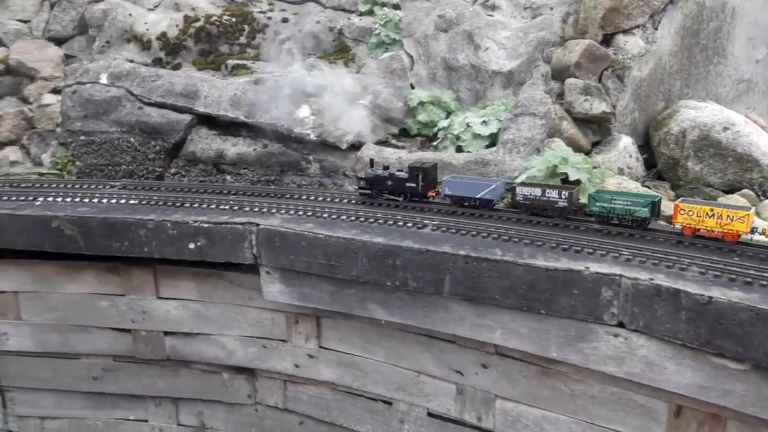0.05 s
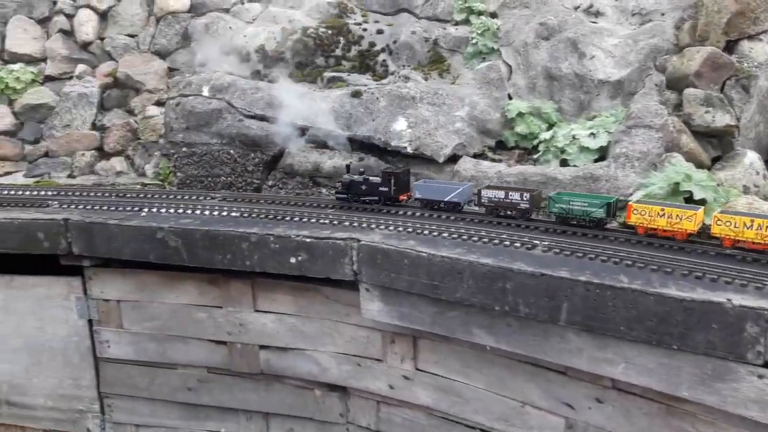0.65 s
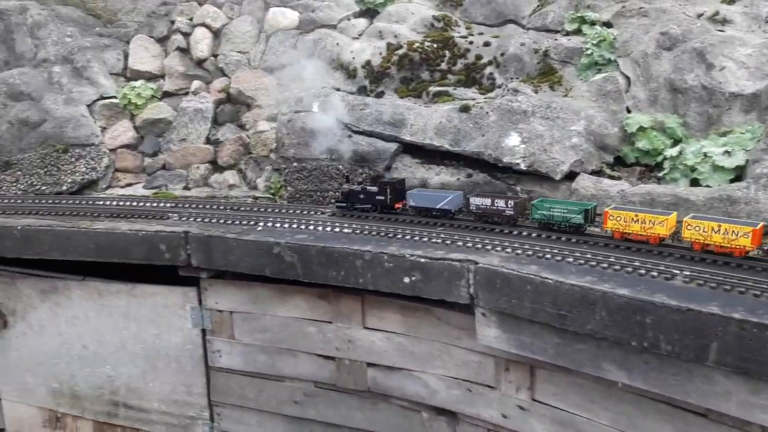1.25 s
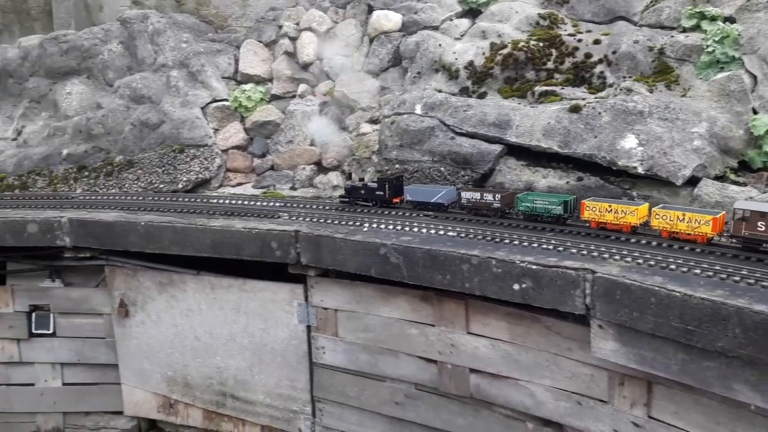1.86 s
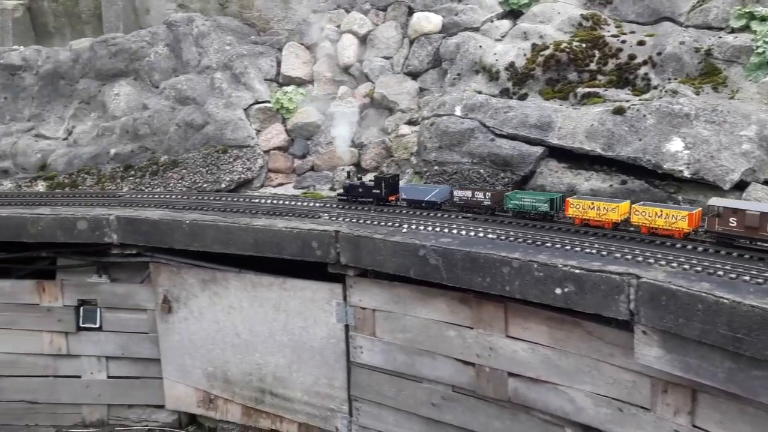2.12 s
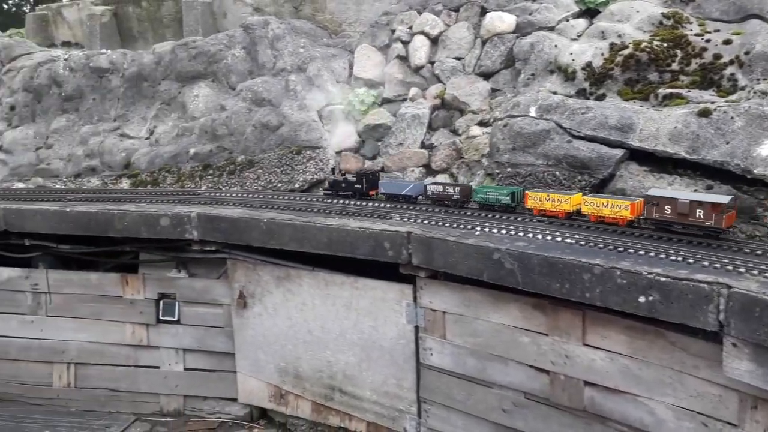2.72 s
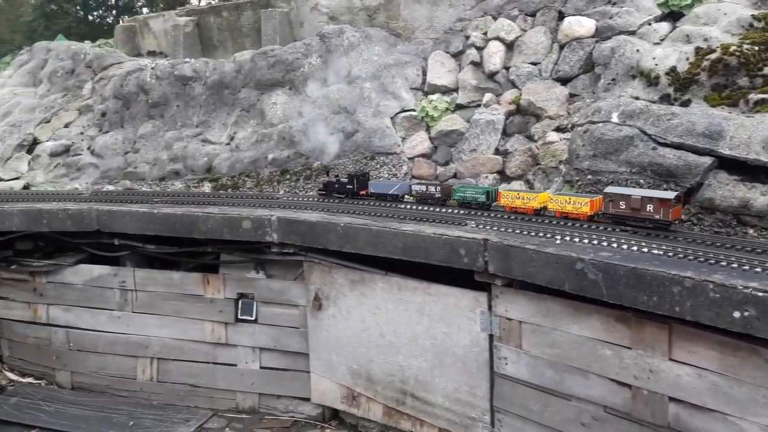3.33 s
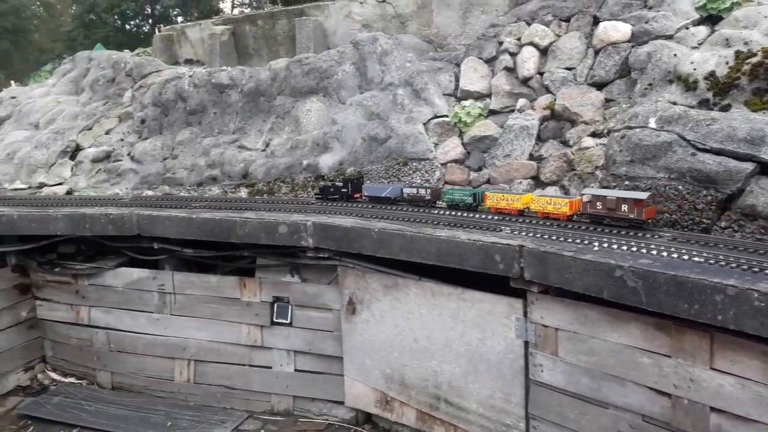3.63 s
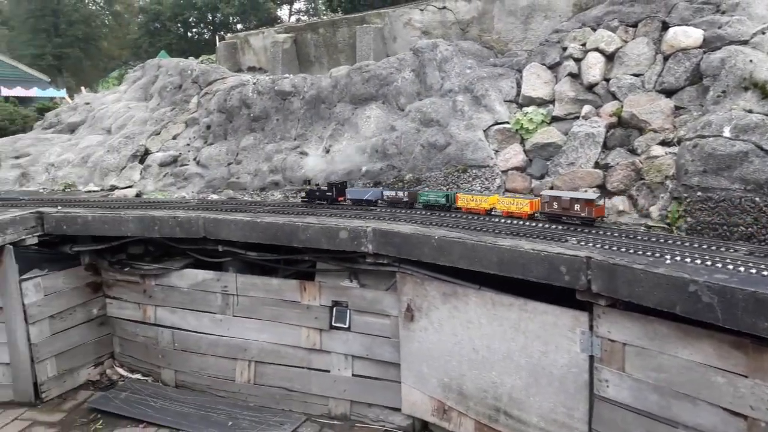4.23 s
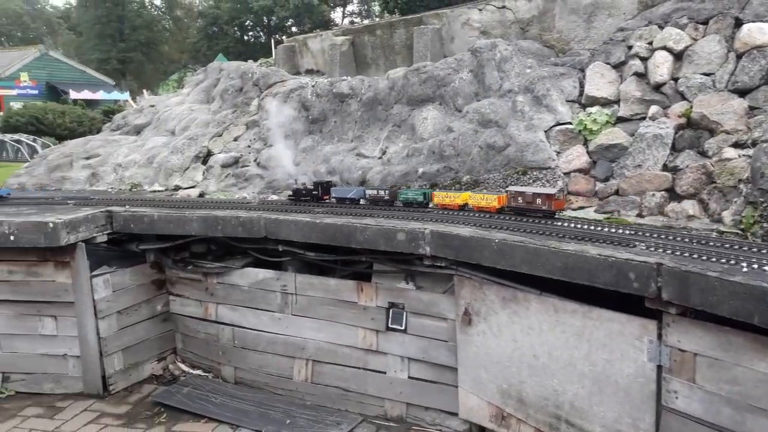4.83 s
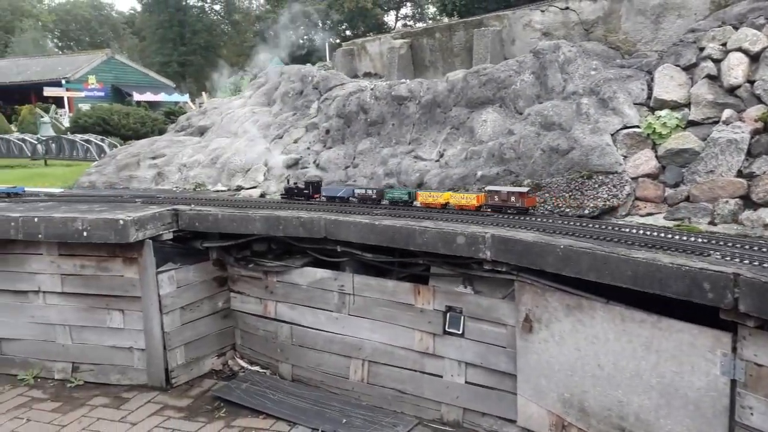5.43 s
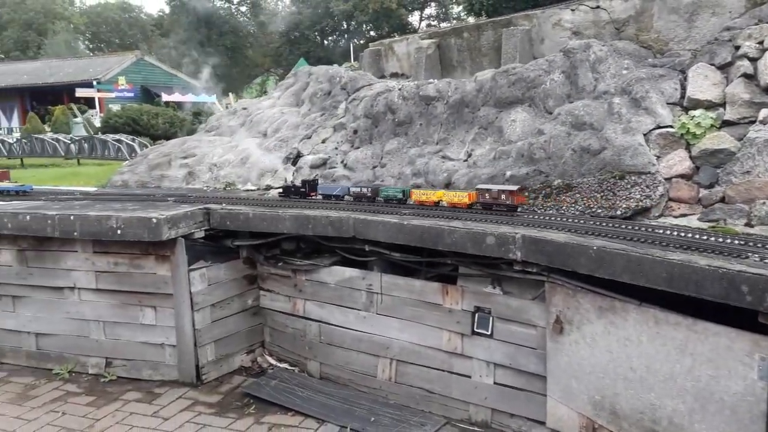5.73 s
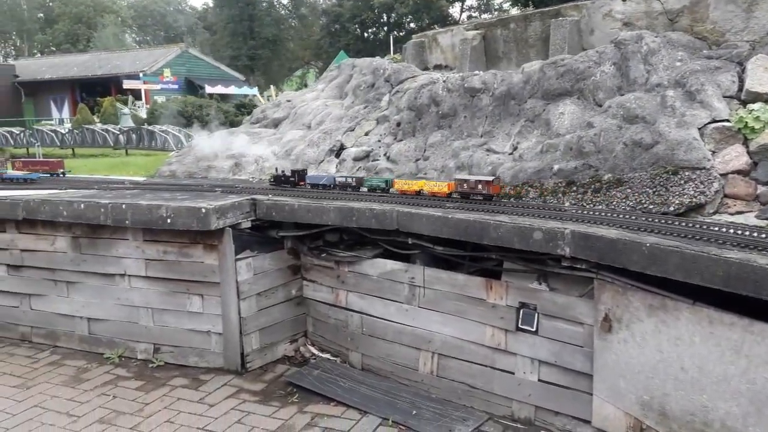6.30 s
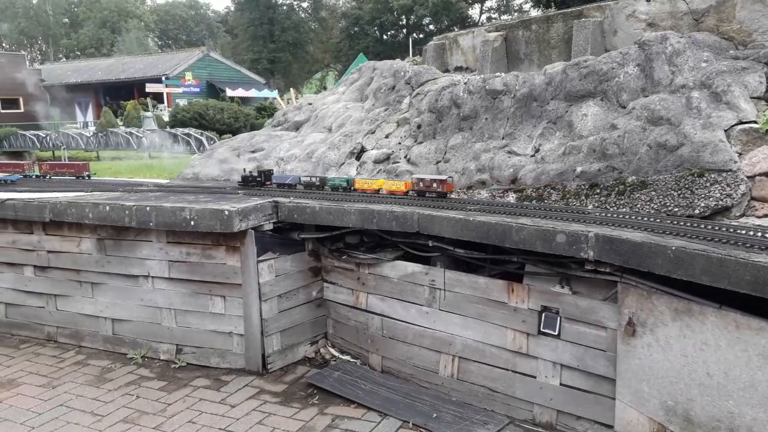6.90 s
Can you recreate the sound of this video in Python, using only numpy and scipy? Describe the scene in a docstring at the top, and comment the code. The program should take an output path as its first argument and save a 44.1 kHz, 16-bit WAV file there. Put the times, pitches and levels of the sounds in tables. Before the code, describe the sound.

A model steam train is close from the start on an outdoor garden track, chuffing very quickly in an uneven four-beat pattern with a thin, throbbing metallic note. Its wheels hiss, scuff and roll with a hollow ring, while a light wind rumbles unevenly on the microphone. From about 0.5 to 2 seconds the wheels give short squeals on the curve. Between 1.8 and 3.2 seconds they clack lightly over several rail joints, and the train gradually draws away, squealing once near 4 seconds. Around 4.5 seconds a bird gives two faint rising chirps. At about 5 seconds a strong gust buffets the microphone with low rumbling and thumps, easing by around 6 seconds. More brief squeals come from 5.5 seconds on, with one more clack near 5.9, and the train is still running, farther off, at 7 seconds.

```python
"""Beside a garden track, one microphone in the open air. From the start a model steam train is close,
chuffing quickly, four beats to a wheel turn; its wheels hiss, scuff and roll with a hollow ring.
From 0.5 s they squeal in bursts on the curve, and from 1.8 s they clack over joints as the train
draws away along a rock wall. Near 4.5 s a bird chirps twice, faintly. Around 5 s the wind, there all
along, buffets the microphone in one strong gust, and the train runs on, farther off."""
import sys
import numpy as np
from scipy import signal
from scipy.fft import rfft, irfft
from scipy.io import wavfile
from scipy.ndimage import uniform_filter1d

SR = 44100
rng = np.random.default_rng(int(sys.argv[2]) if len(sys.argv) > 2 else 0)


def inscribe(sig):
    """Save sig as 16-bit PCM at rate SR to the path in sys.argv[1].

    A 1-D sig is mono; a 2-D sig holds one channel per row.
    Samples are clipped to [-1, 1] before scaling.
    """
    pcm = np.round(np.clip(np.atleast_2d(sig).T, -1, 1) * 32767)
    wavfile.write(sys.argv[1], SR, pcm.astype(np.int16))


N = 311346
TIME = np.arange(N) / SR

# Pace of the engine along the track: time_s, beats_per_s
ENGINE_SPEED = [(0.0, 23.14), (0.59, 22.31), (1.18, 21.47), (1.76, 21.56), (2.35, 21.7), (2.94, 22.12),
                (3.53, 22.67), (4.11, 23.35), (4.7, 23.91), (5.29, 23.47), (5.88, 23.14), (6.46, 21.37),
                (7.05, 20.64)]
def beat_count():
    """Exhaust beats so far: a measure of the distance run."""
    return np.cumsum(curve(ENGINE_SPEED)) / SR - .3


# The four uneven beats of a wheel turn: accent_db
BEAT_ACCENTS = [7.7, 7.8, 8.1, 3.8]
# Exhaust steam at the microphone, close at first, then farther off: time_s, level_db
EXHAUST_LEVEL = [(0, -44.5), (1.5, -44), (3, -48.5), (4.5, -48), (5.8, -51), (7.06, -52.5)]
# Colour of the steam at the chimney: frequency_hz, gain_db
CHIMNEY_COLOUR = [(700, -13), (1700, -9.5), (2500, -15.5), (4400, -5.5), (5200, 3.5), (6100, -3),
                  (7200, -4), (8900, -11.5), (9900, -8), (10800, -13.5), (12000, -36), (13700, -37),
                  (15300, -15.5)]
def chuffs(sharpness=0.56, leak=0.092, uneven_db=3.0, crackle_db=-11):
    """Each piston stroke lets a puff of steam up the chimney."""
    beats = beat_count()
    accent = gain_of(BEAT_ACCENTS)[np.round(beats).astype(int) % len(BEAT_ACCENTS)]
    puffs = abs(np.cos(np.pi * beats)) ** sharpness
    valve = leak + accent * puffs * gain_of(uneven_db * wander(26))
    crackle = gain_of(crackle_db) * specks(per_s=320)  # fine, faint treble crackle in the chuffs
    steam = coloured(noise() + crackle, CHIMNEY_COLOUR)
    return gain_of(curve(EXHAUST_LEVEL)) * unit_rms(valve) * steam


# Wheels hissing on the rails, fading with distance: time_s, relative_level_db
HISS_LEVEL = [(0, -36), (1.8, -36.5), (2.7, -38), (3.4, -39.5), (4.4, -39.5), (5.85, -39.5), (6.15, -43.5),
              (7.06, -45)]
# How hard one wagon wheel rubs: time_s, relative_level_db
SCUFF_LEVEL = [(0, -49), (1.4, -45), (2.3, -44), (3.1, -40), (3.75, -54), (4.3, -45), (4.55, -47),
               (5.9, -60), (6.55, -44), (7.06, -47)]
# High ringing of the wheels: pitch_hz, width_hz, gain_db
HIGH_WHEEL_MODES = [(3249, 110, 2), (3840, 180, -1.5), (4020, 74, -26), (4640, 75, -2), (6200, 110, -8.5),
                    (6580, 150, -6), (6826, 130, 3), (7660, 200, -12)]
def wheel_hiss(hiss_db=-2.12, scuff_db=3.0, uneven_db=2.0, flutter_db=2.14, grit_db=-9, ring_db=-10):
    """Gritty rolling contact hisses, swells as a wheel scuffs once a turn, and sets the wheels ringing."""
    turns_per_beat, rub_at_turns, rub_width_turns = .3135, .76, .31
    turns_from_rub = (turns_per_beat * beat_count() - rub_at_turns + .5) % 1 - .5
    rub = .5 ** ((2 * turns_from_rub / rub_width_turns) ** 2)
    scuff_power = rub * gain_of(curve(SCUFF_LEVEL) + scuff_db + uneven_db * wander(2.7)) ** 2
    hiss_power = gain_of(curve(HISS_LEVEL) + hiss_db) ** 2
    grit = gain_of(grit_db) * specks(per_s=300)
    contact = noise() * gain_of(flutter_db * wander(79)) + grit
    hiss = receding(contact)
    ring = gain_of(ring_db) * ringing(HIGH_WHEEL_MODES)
    return np.sqrt(hiss_power + scuff_power) * (hiss + ring)


# Colour of the wheels near the microphone and far down the track: frequency_hz, gain_db
NEAR_COLOUR = [(600, -16.5), (1500, -3.5), (2450, -11), (2800, -6.5), (3250, -1), (4600, -1), (5100, -3.5),
               (5700, -1.5), (7100, -2), (8900, -18), (10500, -23.5), (12000, -30.5), (13800, -36),
               (15300, -30)]
FAR_COLOUR = [(600, -18), (1400, -0.5), (2050, -10), (2300, -11), (3300, 1), (3850, 2), (4600, -7),
              (5200, 2.5), (6100, 0.5), (7500, 1), (8900, -18), (10500, -24.5), (12200, -43), (15500, -32)]
def receding(x):
    """Bright sound from the wheels changes colour as the train draws away."""
    far = TIME / TIME[-1]
    return (1 - far) * coloured(x, NEAR_COLOUR) + far * coloured(x, FAR_COLOUR)


# Rolling wheels, heard from the trackside: time_s, level_db
ROLL_LEVEL = [(0, -37), (0.4, -36), (1.35, -38.5), (1.85, -38.5), (2.05, -43.5), (2.6, -39), (3.2, -43.5),
              (4.15, -43), (4.7, -49), (5.0, -44.5), (6.4, -46.5), (6.82, -43), (7.06, -50.5)]
# Hollow resonances of wheels and track: pitch_hz, base_width_hz, gain_db
HOLLOW_MODES = [(932.3, 105, 3.5), (971, 216, -7), (1368, 98, -12), (1825, 400, -15.5)]
def rolling(rough_db=2.0, broaden=1.18):
    """Uneven rails shake the wheels, which ring in a few broad resonances."""
    contact = gain_of(rough_db * wander(24))
    ring = sum(gain_of(db) * resonate_twice(contact * noise(), hz, broaden * width)
               for hz, width, db in HOLLOW_MODES)
    return gain_of(curve(ROLL_LEVEL)) * steadied(ring, size=4000)


# Flanges rubbing on the curve: start_s, end_s, relative_level_db, overtones_db
FLANGE_RUBS = [(0.492, 0.505, -21.5, 1), (0.521, 0.571, -31, -5), (1.056, 1.104, -28, -2),
               (1.433, 1.477, -33.5, -14), (1.516, 1.646, -34, -14), (1.788, 1.919, -35, 6),
               (3.843, 3.958, -38.5, 0), (5.09, 5.11, -34.5, -13), (5.488, 5.575, -29.5, -2),
               (5.664, 5.702, -31, -3), (5.929, 5.996, -36, 2.5), (6.033, 6.08, -33, -2),
               (6.392, 6.465, -33, -3), (6.65, 6.705, -35.5, -3), (6.733, 6.883, -34, 1)]
def squeal(pitch_hz=921.7, level_db=-1, chatter_db=3.5, octave_db=-15, rasp_db=-18, edge_s=0.011):
    """Stick and slip locks the lowest wheel resonance into a tone; hard rubs add an octave and a rasp."""
    grip, bite = np.zeros(N), np.zeros(N)
    for start, end, db, overtones_db in FLANGE_RUBS:
        rub = gain_of(db) * np.clip(.5 + np.minimum(TIME - start, end - TIME) / edge_s, 0, 1)
        grip += rub
        bite += rub * gain_of(overtones_db)
    waver = 1 + 0.0131 * wander(67) + 0.01118 * wander(11.84)  # fast jitter, slower drift
    phase = 2 * np.pi * np.cumsum(pitch_hz * waver) / SR
    smear = 0.38  # makes the octave ragged
    octave = (1 + smear * wander(90)) * np.sin(2 * phase) + smear * wander(90) * np.cos(2 * phase)
    rasp = coloured(noise(), [(500, -17), (900, 1), (1300, 6), (2050, 10.5), (2300, -43), (5000, -50)])
    overtones = gain_of(octave_db) * unit_rms(octave) + gain_of(rasp_db) * rasp
    chatter = steadied(gain_of(chatter_db * wander(39)), size=900)
    return gain_of(level_db) * chatter * (grip * unit_rms(np.sin(phase)) + bite * overtones)


# Thin ringing note of the exhaust: time_s, relative_level_db
SINGING_LEVEL = [(0, -48), (0.9, -45), (1.4, -39), (1.9, -46.5), (3.2, -43.5), (4.6, -48), (5.8, -44),
                 (6.15, -49), (7.06, -49)]
# The close pair of resonances that the exhaust rings: pitch_hz, width_hz, gain_db
EXHAUST_MODES = [(5070, 280, 2), (5345, 110, -3.5)]
def exhaust_singing(level_db=-1.5, beat_db=2.5, turn_db=0.5, loudest_at_turns=0.26, uneven_db=0.5):
    """A thin metallic note throbs with each exhaust beat and swells once a turn of the driving wheels."""
    beats = beat_count()
    turns = beats / len(BEAT_ACCENTS)
    pulse_db = beat_db * np.cos(2 * np.pi * beats)
    swell_db = turn_db * np.cos(2 * np.pi * (turns - loudest_at_turns))
    throb = unit_rms(gain_of(pulse_db + swell_db + uneven_db * wander(4.7)))
    note = steadied(ringing(EXHAUST_MODES), size=5000)
    return gain_of(curve(SINGING_LEVEL) + level_db) * throb * note


# Wheels knocking over rail joints: time_s, level_db, decay_s
JOINT_KNOCKS = [(1.834, -33.5, 0.041), (2.152, -25.5, 0.0062), (2.286, -40, .002), (2.566, -29.5, .007),
                (3.043, -29, 0.0045), (3.173, -29.5, 0.0035), (5.899, -27.5, .006)]
def clacks(rise_s=0.00043):
    """Each knock is a short rattle of small metal parts."""
    blows = np.zeros(N)
    for at, db, decay in JOINT_KNOCKS:
        age = TIME - at
        blows += gain_of(db) * np.exp(np.minimum(age, 0) / rise_s - np.maximum(age, 0) / decay)
    return blows * receding(noise())


# Light breeze through the garden: time_s, level_db
GARDEN_BREEZE = [(0, -41), (0.25, -45), (0.52, -61.5), (0.68, -45), (1.68, -47.5), (1.8, -50.5),
                 (2.45, -46.5), (3.05, -42), (3.3, -53), (3.9, -57.5), (4.02, -46), (4.8, -41.5),
                 (5.63, -50), (6.32, -35.5), (6.45, -55.5), (6.62, -48.5), (6.95, -51)]
# Gusts reaching the microphone: start_s, fall_time_s, level_db
MICROPHONE_GUSTS = [(0.01, 0.18, -34.5), (0.607, 0.072, -33.5), (0.85, 0.2, -38.5), (0.995, .16, -32),
                    (1.347, .16, -30.5), (1.53, 0.059, -34), (2.256, 0.13, -31.5), (2.767, 0.079, -35.5),
                    (3.165, 0.044, -34), (4.286, 0.047, -32), (4.395, 0.18, -34), (4.534, .09, -31.5),
                    (4.864, 0.14, -22), (4.955, 0.11, -16), (5.037, 0.24, -22), (5.228, 0.29, -17),
                    (5.693, 0.072, -30), (5.855, 0.045, -29.5), (5.94, .08, -27.5), (6.064, 0.21, -27.5),
                    (6.756, 0.045, -34), (7.044, 0.12, -28.5)]
def wind_strength(restless_db=4.5, rise_s=0.021, fall_db=-14):
    """Wind level in dB: over a restless breeze, gusts rise quickly, then die away ever faster."""
    power = gain_of(curve(GARDEN_BREEZE) + restless_db * wander(6.2)) ** 2
    for start, fall_time, db in MICROPHONE_GUSTS:
        age = np.maximum(TIME - start, 0)
        rise = np.minimum(age / rise_s, 1)
        power += (rise * gain_of(db + fall_db * (age / fall_time) ** 2)) ** 2
    return 10 * np.log10(power)


# Colour of a light breeze and of a full gust on the microphone: frequency_hz, gain_db
BREEZE_COLOUR = [(20, -34), (40, -15), (65, -1), (110, 5), (170, -3), (250, -13), (360, -34), (600, -28.5),
                 (1200, -42), (3000, -90)]
GUST_COLOUR = [(20, -36), (40, -18), (70, -0.5), (140, 6.5), (260, -0.5), (400, -11.5), (650, -24.5),
               (1000, -33), (1600, -56), (3000, -85)]
def wind(lumpy_db=5.0, breeze_db=-40, gust_db=-22):
    """Lumpy turbulence on the microphone; stronger wind sheds smaller, brighter eddies."""
    strength_db = wind_strength()
    gusty = np.clip((strength_db - breeze_db) / (gust_db - breeze_db), 0, 1)
    eddies = noise() * gain_of(lumpy_db * wander(63))
    pressure = (1 - gusty) * coloured(eddies, BREEZE_COLOUR) + gusty * coloured(eddies, GUST_COLOUR)
    return gain_of(strength_db) * steadied(pressure, size=1400)


# Single eddies slapping the microphone: time_s, push_db, half_width_s
EDDY_SLAPS = [(1.407, -22, 0.00086), (1.5772, -24.5, 0.00078), (4.9223, -10, 0.00049), (4.96, -14, 0.00061),
              (4.9841, -11, 0.00088), (5.002, -5.5, 0.00077), (5.1123, -7.5, 0.00076),
              (5.2463, -3.5, 0.00041), (5.318, -14.5, 0.00051), (5.391, -9.5, 0.0013),
              (5.44, -15.5, 0.00044), (6.103, -11, 0.00074), (6.1456, -16, 0.00099)]
def buffets(suction=0.35, low_cut_hz=60):
    """An eddy pushes sharply, then sucks back for longer."""
    pressure = np.zeros(N)
    for at, db, half_width in EDDY_SLAPS:
        near = abs(TIME - at) < .02
        offset = (TIME[near] - at) / half_width
        after = np.maximum(offset, 0) / 2
        push = np.exp(-offset ** 2)
        pull = suction * after ** 2 * np.exp(2 * (1 - after))
        pressure[near] += gain_of(db) * (push - pull)
    return signal.sosfilt(signal.butter(1, low_cut_hz, "high", fs=SR, output="sos"), pressure)


# A faint bird in the garden: start_s, length_s, first_pitch_hz, last_pitch_hz, level_db
BIRD_CHIRPS = [(4.508, 0.068, 4050, 4600, -41.5), (4.665, 0.12, 3800, 4520, -45.5)]
def bird():
    """Thin whistles that rise steadily and are loudest about two thirds of the way up."""
    whistles = np.zeros(N)
    for start, length, first_hz, last_hz, db in BIRD_CHIRPS:
        progress = np.clip((TIME - start) / length, 0, 1)
        pitch_hz = first_hz + (last_hz - first_hz) * progress
        swell = np.sqrt(abs(np.sin(np.pi * progress ** 1.8)))
        whistles += gain_of(db) * swell * np.sin(2 * np.pi * np.cumsum(pitch_hz) / SR)
    return whistles


# Colour of the outdoor air in the distance: frequency_hz, gain_db
AIR_COLOUR = [(20, -8), (80, 10), (200, -32), (400, -15.5), (800, 1.5), (2000, -7), (6000, -8),
              (15000, -58)]
def air(level_db=-56):
    """The soft wash of the open air."""
    return gain_of(level_db) * coloured(noise(), AIR_COLOUR)


def gain_of(db):
    """Decibels to amplitude."""
    return 10 ** (np.asarray(db) / 20)


def unit_rms(x):
    """Scales to an rms of one."""
    return x / np.sqrt(np.mean(x ** 2) + 1e-20)


def curve(rows):
    """Joins (time_s, value) rows by straight lines."""
    return np.interp(TIME, *np.transpose(rows))


def coloured(x, points):
    """Filters x by (frequency_hz, gain_db) points, at unit rms."""
    hz, db = np.transpose(points)
    bins = np.fft.rfftfreq(N, 1 / SR)
    gain = gain_of(np.interp(np.log(bins + 1), np.log(hz), db))
    return unit_rms(irfft(rfft(x) * gain, N))


def noise():
    """White noise."""
    return rng.standard_normal(N)


def specks(per_s):
    """Randomly scattered clicks, at unit rms."""
    return unit_rms((rng.random(N) < per_s / SR) * noise())


def wander(rate_hz):
    """Smooth random motion of unit rms, up to about the given rate."""
    bins = np.fft.rfftfreq(N, 1 / SR)
    return unit_rms(irfft(rfft(noise()) * np.exp(-.5 * (bins / rate_hz) ** 2), N))


def steadied(x, size):
    """Takes out swells slower than about size samples, leaving the fast grain."""
    return x / np.sqrt(uniform_filter1d(uniform_filter1d(x ** 2, size), size) + 1e-9)


def resonate_twice(x, hz, width_hz):
    """Two passes through a two-pole resonance of gain one."""
    pole = np.exp((-np.pi * width_hz + 2j * np.pi * hz) / SR)
    for _ in range(2):
        x = 2 * signal.lfilter([1 - abs(pole)], [1, -pole], x).real
    return x


def ringing(modes, swell_db=3.5):
    """Noise-driven modes, each swelling on its own."""
    return unit_rms(sum(gain_of(db + swell_db * wander(9.6)) * unit_rms(resonate_twice(noise(), hz, width))
                        for hz, width, db in modes))


def scene():
    """Train, wind and garden at one trackside microphone."""
    train = chuffs() + wheel_hiss() + clacks() + exhaust_singing() + rolling() + squeal()
    return (train + wind() + buffets() + bird() + air())[None]


def record(dry):
    """The recorder's band limit cuts the highest treble."""
    edge_hz = 15750
    low_pass = signal.firwin(1023, edge_hz, window=("kaiser", 9), fs=SR)
    return signal.oaconvolve(dry, low_pass[None], "same")


dry = scene()
out = record(dry)
inscribe(out)
```